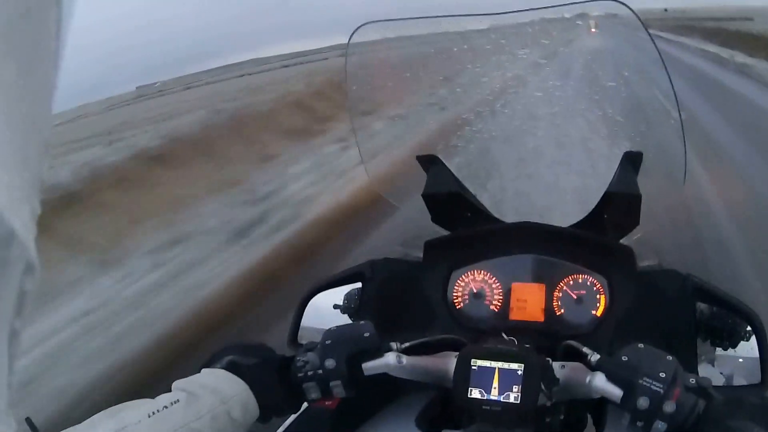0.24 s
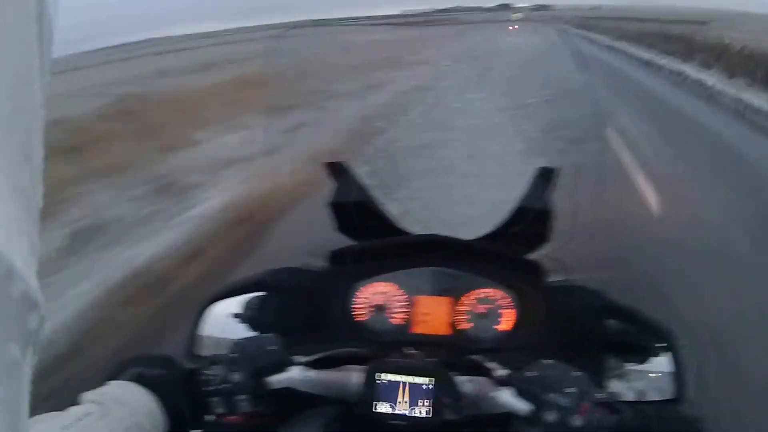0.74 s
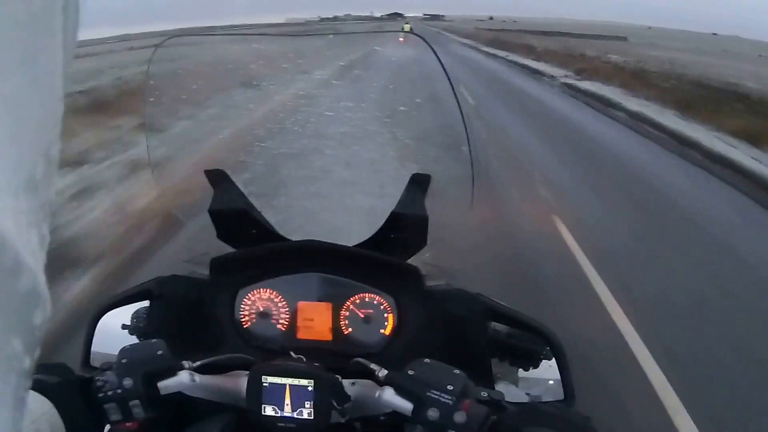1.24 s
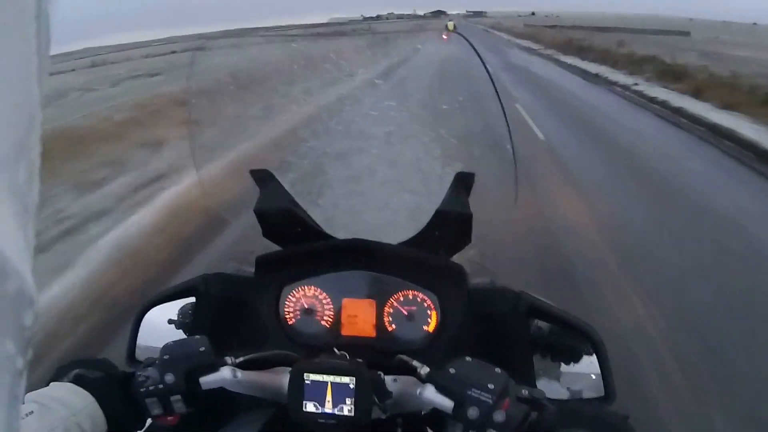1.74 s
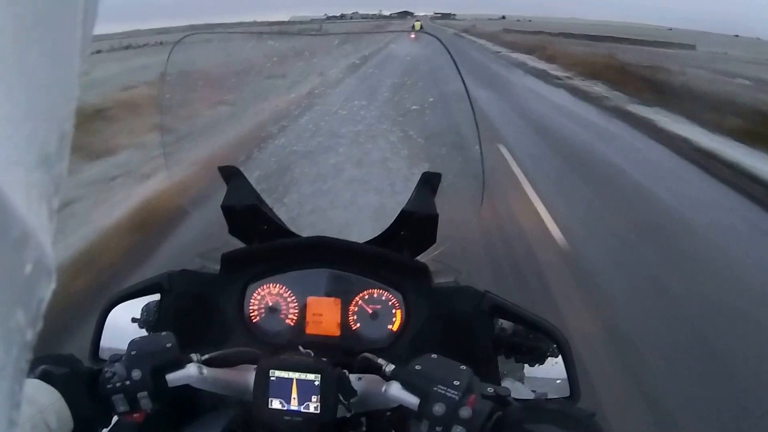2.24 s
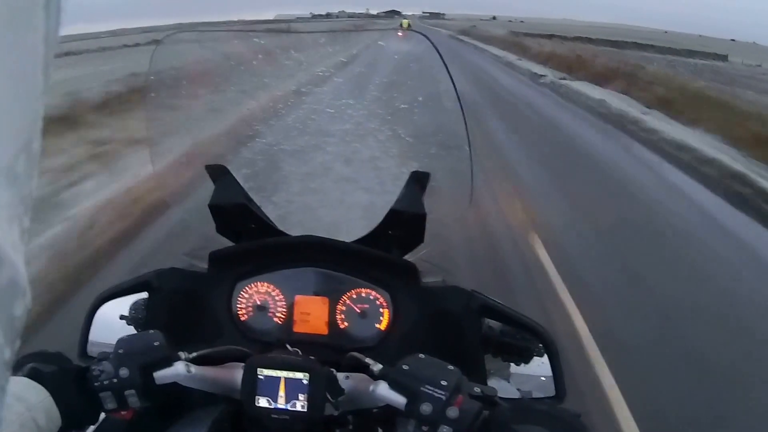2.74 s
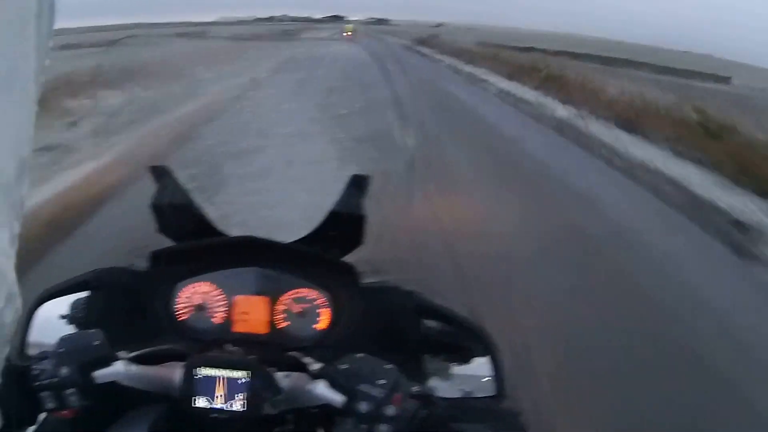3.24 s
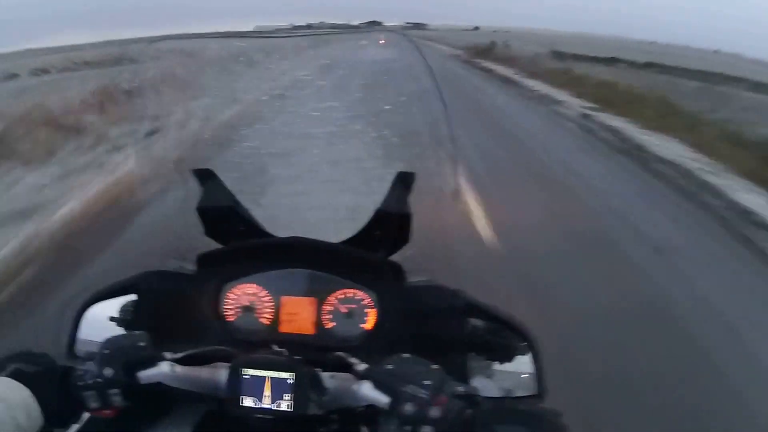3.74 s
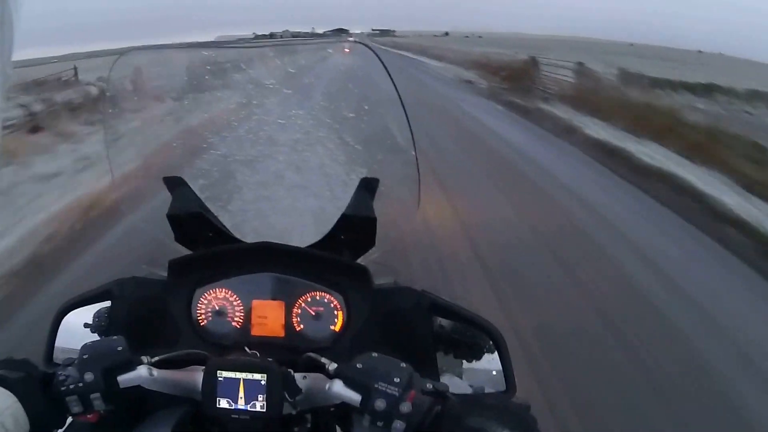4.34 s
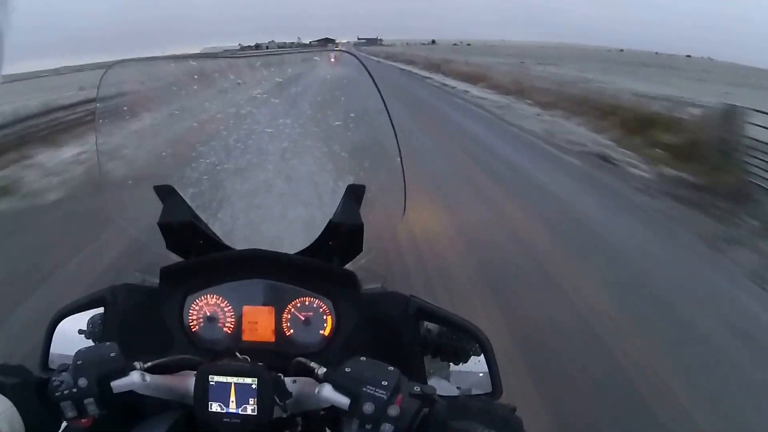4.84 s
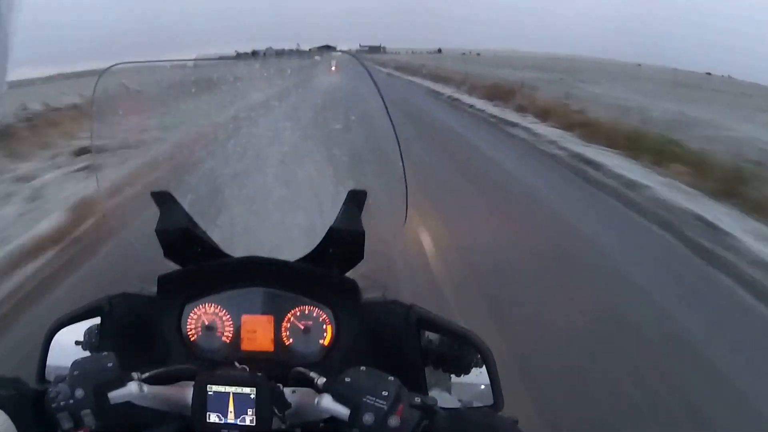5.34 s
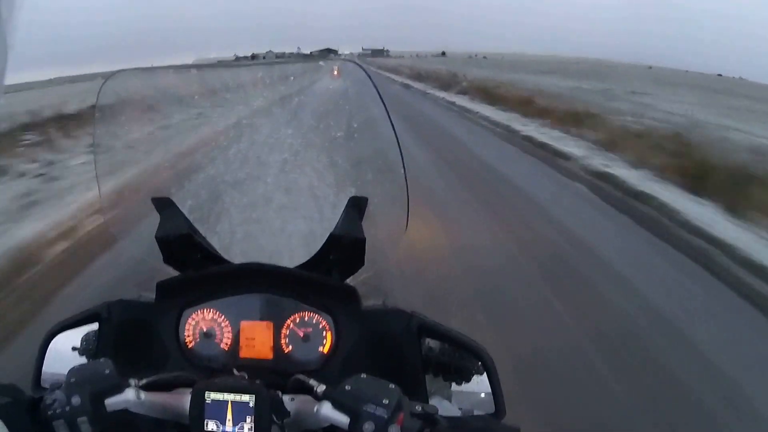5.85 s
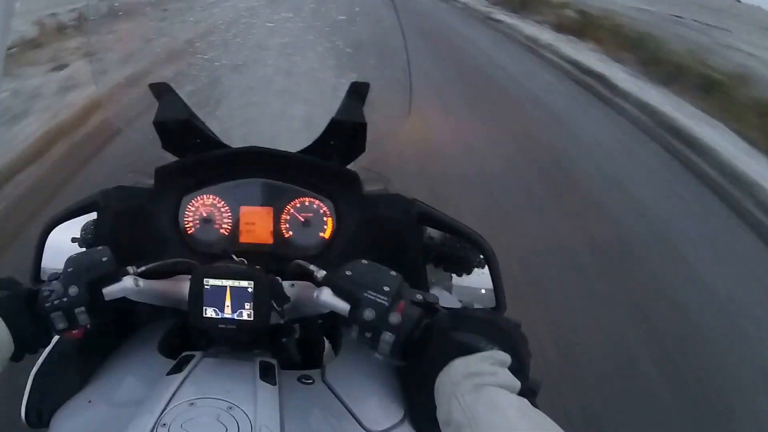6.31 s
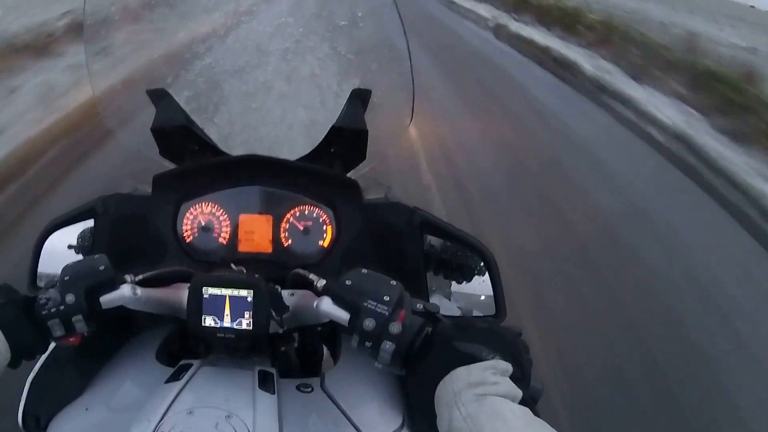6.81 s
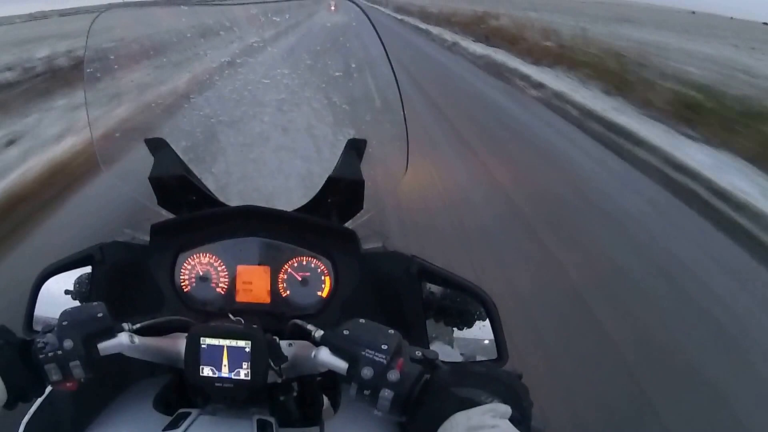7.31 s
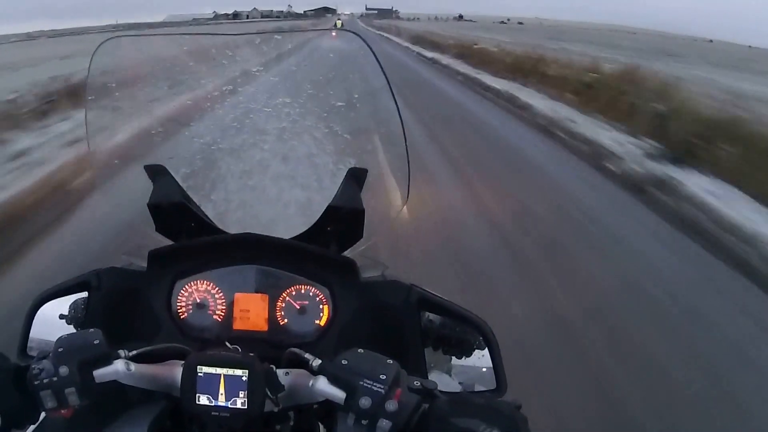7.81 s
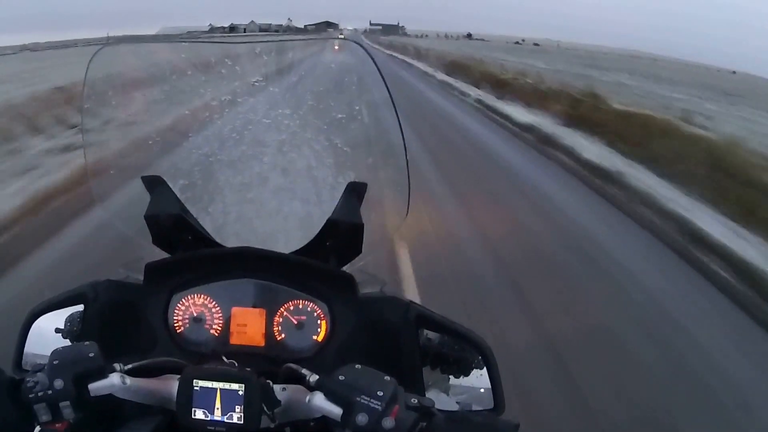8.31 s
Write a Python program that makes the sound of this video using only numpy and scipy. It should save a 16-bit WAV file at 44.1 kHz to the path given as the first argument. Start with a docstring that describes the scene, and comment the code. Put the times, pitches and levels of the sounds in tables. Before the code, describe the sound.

Close wind roar dominates a motorcycle ride along an open wet road. Gusts off the windscreen swell, hold briefly and break off abruptly, with deep rumble, fluttering buffets and sharp slaps. A low, steady engine hum and even tyre hiss sit far beneath. A thin electrical whine cuts out early and returns midway; small puffs of spray and drops tick later. The rider-worn microphone sounds almost mono.

```python
"""Wind roars at a small camera worn by the rider of a touring motorcycle on a wet country road.
Gusts off the windscreen build, hold and break away, driving filtered noise: rumble, buffeting, rush and hiss.
The engine, a few wavering sines, hums faintly underneath, over an even noise from the wet tyres.
Now and then spray hisses (filtered clicks) and a drop ticks on the housing (a short noise burst);
a thin electrical whine, a sum of steady sines, stops and comes back."""
import sys
import numpy as np
from scipy import signal
from scipy.fft import rfft, irfft, next_fast_len
from scipy.io import wavfile
from scipy.ndimage import uniform_filter1d

SR = 44100
rng = np.random.default_rng(int(sys.argv[2]) if len(sys.argv) > 2 else 0)


def generate_wav(signal):
    """Clip the signal to [-1, 1] and save it as 16-bit WAV at the path in sys.argv[1]."""
    frames = np.transpose(np.atleast_2d(signal))
    scaled = np.clip(frames, -1, 1) * 32767
    pcm = np.round(scaled).astype(np.int16)
    wavfile.write(sys.argv[1], SR, pcm)


N = 377937  # samples

# colour of water striking the housing: freq_hz, relative density_db (per Hz)
WATER_COLOUR = [(3500, 4), (7800, -10), (9200, -1), (10400, 1.5), (12000, -7), (15500, -12)]

# each voice of the wind: its base level (dB), and the dB it gains per dB of flow
RUMBLE_DB, RUMBLE_FOLLOWS = -25.3, 0.4
BUFFET_DB, BUFFET_FOLLOWS = -20.6, 0.95
RUSH_DB, RUSH_FOLLOWS = -40.2, 1.0
HISS_DB, HISS_FOLLOWS = -51, 1.2

TILT_LOSS = 0.3  # dB the buffeting loses for each dB of tilt
SLAP_IN_RUSH = 0.5  # share of a slap's rise in dB that reaches the rush
GUST_ATTACK_S, GUST_RELEASE_S = 0.1, 0.024
SLAP_ATTACK_S, SLAP_FADE_S = 0.002, 0.007
SWIRLS_PER_S, SWIRL_DB = 12, 0.6  # small random swirls: turns a second, spread in dB
FIRING_HZ = 97.3  # mean firing rate of the engine
CUTOFF_HZ = 15400  # top of the microphone's band


def wind(flow_db, push_db, rush_db):
    """Rumble, buffeting, rush and hiss rise with the same gusts; all but the rumble share the quick eddies."""
    # level of the hiss over time: time_s, level_db
    hiss_course = [(0, 1.6), (.4, 2.5), (1.55, -0.2), (2.25, 2), (3.15, -1), (4.1, .6), (6.9, -1.1),
                   (7.3, 1.8), (8.57, 0.3)]
    # tilt of the buffeting towards its upper half: time_s, tilt_db
    tilt_course = [(0, .5), (.5, .5), (1.2, -1.2), (3, -1.5), (4.4, .3), (4.75, 3), (5.6, 0), (6.1, 1.5),
                   (6.9, -1), (8.05, .5), (8.35, 4), (8.57, 3)]
    eddies = drift(rate=35.0)
    slap_db = slaps()
    tilt_db, = in_time(tilt_course)
    treble_db, = in_time(hiss_course)
    rumble_db = RUMBLE_DB + RUMBLE_FOLLOWS * flow_db + wavering(rate=4, depth_db=1.0)
    buffet_db = BUFFET_DB + BUFFET_FOLLOWS * push_db - TILT_LOSS * tilt_db + slap_db
    hiss_db = HISS_DB + HISS_FOLLOWS * flow_db + treble_db + wavering(rate=12, depth_db=0.95)
    return (rumble(rumble_db)
            + buffet(buffet_db, tilt_db, eddies, eddy_db=1.02, lump_db=1.1, split_hz=270)
            + rush(rush_db + SLAP_IN_RUSH * slap_db, eddies, eddy_db=0.85, tear_db=0.8)
            + hiss(hiss_db, eddies, eddy_db=1.55))


def flow():
    """Airflow and buffeting in dB: the stream, the strongest gust of the moment and random swirls."""
    # the airstream between gusts: time_s, relative level_db
    stream = [(0.0, -0.5), (0.6, 0.0), (2.45, 0), (3.2, -0.4), (4.8, -1.8), (5.3, 0), (6.5, 1.27),
              (7.5, 1.0), (8.1, -2.5), (8.57, 2.2)]
    # gusts off the windscreen: start_s, length_s, air_rise_db (airflow), push_rise_db (buffeting)
    gusts = [(-0.09, 0.26, 3.5, 2.5), (0.15, 0.37, 5.5, 6.5), (0.704, 0.057, 2.5, 5.5),
             (0.777, 0.12, 2, 4.0), (0.933, 0.12, 4.5, 5), (1.25, 0.26, 4.5, 5.0), (1.53, 0.15, 5, 5.0),
             (1.782, 0.19, 4.5, 4), (2.092, 0.13, 2.0, 1.5), (2.17, 0.11, 6.5, 2), (2.31, 0.06, 1.5, 3),
             (2.521, 0.13, 2, 4.5), (2.679, 0.17, 5.5, 6), (2.828, 0.25, 3.5, 4.5), (3.309, 0.16, 6, 6.0),
             (3.507, 0.064, 7.5, 6.5), (3.607, 0.59, 3.5, 3.5), (4.07, 0.26, 3.5, 6),
             (4.285, 0.18, 6.5, 7.0), (4.49, 0.25, 4.0, 3), (4.83, 0.05, 5, 4), (4.938, 0.22, 3.5, 3.5),
             (5.398, 0.296, 4.5, 5), (5.813, 0.058, 4, 3.5), (6.037, 0.097, 4.0, 4.0),
             (6.19, 0.43, 2.5, 3.0), (6.582, 0.19, 4.0, 5.5), (6.84, 0.14, 3, 4.5), (6.929, 0.12, 4.5, 7.5),
             (7.08, 0.33, 3, -1), (7.482, 0.28, 4.0, 3.5), (7.8, 0.2, 4.5, 4.5), (8.13, 0.22, 4.5, 6),
             (8.453, 0.09, 3.5, 2)]
    stream_db = in_time(stream)[0] + SWIRL_DB * drift(rate=SWIRLS_PER_S)
    air_db, push_db = 0, 0
    for start_s, length_s, air_rise_db, push_rise_db in gusts:
        shape = gust(start_s, length_s)
        air_db = np.maximum(air_db, air_rise_db * shape)
        push_db = np.maximum(push_db, push_rise_db * shape)
    return stream_db + air_db, stream_db + push_db


def gust(start_s, length_s):
    """A gust builds, holds and breaks away quickly; height 1."""
    age = np.arange(N) / SR - start_s
    build = np.clip(age / min(GUST_ATTACK_S, length_s), 0, 1)
    break_away = np.clip(1 - (age - length_s) / GUST_RELEASE_S, 0, 1)
    return build * break_away


def slaps():
    """The sudden, quickly fading rise in dB that each hard eddy gives to the wind at the port."""
    # hard eddies that slap the port: time_s, strength_db
    slap_rows = [(1.603, 6), (2.102, 9), (2.405, 8), (2.772, 6), (3.339, 8), (4.454, 3.5), (5.571, 7),
                 (6.464, 6.5), (7.045, 5), (7.185, 7), (7.441, 7)]
    t = np.arange(N) / SR
    rise_db = np.zeros(N)
    for s, strength_db in slap_rows:
        attack = np.clip(1 + (t - s) / SLAP_ATTACK_S, 0, 1)
        fade = np.exp(-np.maximum(t - s, 0) / SLAP_FADE_S)
        rise_db += strength_db * attack * fade
    return rise_db


def rumble(level_db):
    """The big eddies of the wake press slowly on the microphone."""
    # colour of the rumble: freq_hz, relative density_db (per Hz)
    rumble_colour = [(14, -8), (25, 1), (35, -4), (52, 3), (75, 1.5), (95, -3.5), (130, -20)]
    pressure = coloured(rng.standard_normal((2, N)), rumble_colour)
    return from_db(level_db) * steadied(pressure, span_s=0.27)


def buffet(level_db, tilt_db, eddies, eddy_db, lump_db, split_hz):
    """Smaller eddies burst on the port in quick lumps and make a higher roar than the rumble."""
    # colour of the buffeting: freq_hz, relative density_db (per Hz)
    buffet_colour = [(60, -13.5), (80, -8), (105, 0), (155, 0.5), (200, -3), (265, -5.5), (340, -5),
                     (420, -9.5), (500, -15.5), (630, -21.5), (800, -26), (1100, -39), (1800, -39)]
    lumpy = rng.standard_normal((2, N)) * from_db(lump_db * drift(rate=51))
    pressure = coloured(lumpy, buffet_colour)
    lowpass = signal.butter(2, split_hz, fs=SR, output="sos")
    deep = signal.sosfiltfilt(lowpass, pressure)
    tilted = deep + from_db(tilt_db) * (pressure - deep)
    return from_db(level_db) * steadied(tilted * from_db(eddy_db * eddies), span_s=0.079)


def rush(level_db, eddies, eddy_db, tear_db):
    """Fine turbulence sounds in the hollows of the housing and flutters with every eddy."""
    # colour of the rush, with the hollows of the housing: freq_hz, relative density_db (per Hz)
    rush_colour = [(550, 2), (800, -8), (1080, 2.5), (1300, -1), (1600, 1), (2100, -3.5), (2450, -6),
                   (2700, -4.5), (3250, -5), (4200, -12.5), (6000, -39)]
    torn = rng.standard_normal((2, N)) * from_db(tear_db * drift(rate=77))
    return from_db(level_db + eddy_db * eddies) * coloured(torn, rush_colour)


def hiss(level_db, eddies, eddy_db):
    """The finest turbulence fizzes at the port, swelling with the same eddies."""
    # colour of the hiss: freq_hz, relative density_db (per Hz)
    hiss_colour = [(3000, -2), (4200, -3.5), (4800, 2.5), (6300, -6), (7100, -5.5), (8000, -11), (8900, -7),
                   (10500, -10.5), (12000, -15.5), (13500, -18), (15500, -26)]
    fizz = coloured(grains(per_s=16000, spread_db=4.5), hiss_colour)
    return from_db(level_db + eddy_db * eddies) * fizz


def engine(wander, throb_db):
    """The lowest orders of a twin at steady throttle, wavering a little in pitch and level."""
    # engine orders: order (multiple of the firing rate), level_db (rms, before the throb)
    orders = [(.5, -39), (1, -31.5), (2, -37.5)]
    turns = np.cumsum(FIRING_HZ * (1 + wander * drift(rate=1.59))) / SR
    hum = np.zeros(N)
    for order, level_db in orders:
        level = np.sqrt(2) * from_db(level_db + throb_db * drift(rate=2.3))
        hum += level * np.sin(2 * np.pi * order * turns)
    return hum


def spray():
    """Many tiny droplets merge into a short bright puff."""
    # puffs of spray: time_s, spread_s (of the bell), level_db (rms at the crest)
    puff_rows = [(5.38, 0.023, -53), (5.513, 0.02, -39.5), (7.2, .038, -44), (7.334, 0.029, -43.5),
                 (7.485, 0.028, -47)]
    puffs = sum(from_db(level_db) * bell(s, spread_s) for s, spread_s, level_db in puff_rows)
    return puffs * coloured(grains(per_s=4500, spread_db=-2.0), WATER_COLOUR)


def drops(decay_s):
    """A larger drop splats on the housing with a short bright tick of decaying noise."""
    # drops on the housing: time_s, level_db (at the start of the tick)
    drop_rows = [(0.0495, -37.5), (1.9994, -42), (4.778, -38), (7.3332, -34), (7.5994, -39), (7.634, -36),
                 (8.4095, -35)]
    hits = np.zeros(N)
    for s, level_db in drop_rows:
        hits[round(s * SR)] = from_db(level_db)
    decay = np.exp(-1 / (decay_s * SR))
    splats = signal.lfilter([1], [1, -decay], hits + 1e-18)  # the tiny offset avoids denormals
    return splats * coloured(rng.standard_normal((2, N)), WATER_COLOUR)


def whine(rush_db, follow, flicker_db, trim_db):
    """Electrical interference: a steady set of partials that switches on and off and swells with the rush."""
    # partials of the whine: freq_hz, level_db (before trim and swell)
    partials = [(800, -52), (2400, -52.5), (3200, -50), (4000, -54), (5600, -57), (6400, -55), (7200, -61),
                (8800, -70), (12000, -68), (12800, -63), (13600, -66), (15200, -66)]
    # when the whine sounds: on_s, off_s
    spells = [(-1, 1.355), (4.39, 9)]
    t = np.arange(N) / SR
    switched = sum(1. * ((t > on_s) & (t < off_s)) for on_s, off_s in spells)
    on = uniform_filter1d(switched, size=400)
    # every partial fits whole cycles in a second, so one second repeats without a seam
    second = sum(from_db(level_db) * np.sin(2 * np.pi * (hz * t[:SR] + rng.random()))
                 for hz, level_db in partials)
    swell_db = follow * (rush_db - np.mean(rush_db)) + flicker_db * drift(rate=33)
    return np.sqrt(2) * on * np.resize(second, N) * from_db(trim_db + swell_db)


def tyres(level_db):
    """An even hiss from the wet tarmac fills the lulls."""
    # colour of wet tyres: freq_hz, relative density_db (per Hz)
    tyre_colour = [(1500, 8), (5000, -3.5), (10000, -10.5), (15500, -18)]
    return from_db(level_db) * coloured(rng.standard_normal((2, N)), tyre_colour)


def from_db(db):
    """Decibels to gain."""
    return np.exp(np.asarray(db) * (np.log(10) / 20))


def rms_one(x):
    """Scale to rms 1."""
    return x / np.sqrt(np.mean(x ** 2) + 1e-20)


def in_time(rows):
    """The columns of a curve at every sample."""
    s, *columns = np.transpose(rows)
    return [np.interp(np.arange(N) / SR, s, c) for c in columns]


def at_hz(points, hz):
    """Read a spectrum on a log-frequency axis."""
    f, value = np.transpose(points)
    return np.interp(np.log(hz), np.log(f), value)


def drift(rate):
    """Smooth chance with about this many turns a second; spread 1."""
    step = 40  # samples between the slow values
    r = np.exp(-2 * np.pi * rate * step / SR)
    white = rng.standard_normal(N // step + 2002)
    slow = signal.lfilter([1], [1, -2 * r, r * r], white)[2000:]  # drop the filter's run-in
    return np.interp(np.arange(N) / step, np.arange(len(slow)), rms_one(slow))


def wavering(rate, depth_db):
    """A voice's own random rise and fall in dB."""
    return depth_db * drift(rate)


def bell(s, spread_s):
    """A smooth Gaussian bump of height 1 around the time s."""
    out, t = np.zeros(N), np.arange(N) / SR
    near = np.abs(t - s) < 4 * spread_s
    out[near] = np.exp(-0.5 * ((t[near] - s) / spread_s) ** 2)
    return out


def grains(per_s, spread_db):
    """Two trains of random clicks of uneven size; rms 1."""
    born = rng.random((2, N)) < per_s / SR
    sizes = from_db(spread_db * np.minimum(rng.exponential(1, (2, N)), 4))
    return rms_one(born * sizes * rng.choice([-1, 1], (2, N)))


def coloured(source, colour):
    """Give two white sources a spectrum and make them the mid and side of a narrow stereo pair; rms 1."""
    # width of the stereo image: freq_hz, side_db (relative to mid)
    width = [(30, -45), (250, -40.5), (2000, -41), (12000, -23)]
    size = next_fast_len(N)
    hz = np.maximum(np.arange(size // 2 + 1) * SR / size, 1)
    lowest_hz, highest_hz = colour[0][0], colour[-1][0]
    skirts = np.minimum(1, np.minimum(hz / lowest_hz, highest_hz / hz)) ** 4  # 24 dB an octave
    mid, side = rfft(source, size) * from_db(at_hz(colour, hz)) * skirts
    side = side * from_db(at_hz(width, hz))
    return rms_one(irfft([mid + side, mid - side], size)[:, :N])


def steadied(x, span_s):
    """Even out the slow swells of a noise, so that the flow sets them."""
    power = uniform_filter1d(np.mean(x ** 2, axis=0), max(int(span_s * SR), 2))
    smooth_power = uniform_filter1d(power, max(int(span_s * SR / 2), 2))
    return x / np.sqrt(smooth_power + 1e-9)


def scene():
    """Wind on the microphone, with engine, water and whine beneath it."""
    flow_db, push_db = flow()
    rush_db = RUSH_DB + RUSH_FOLLOWS * flow_db
    hum = engine(wander=0.01426, throb_db=2.0)
    water = spray() + drops(decay_s=0.0017) + tyres(level_db=-49.0)
    interference = whine(rush_db, follow=0.81, flicker_db=0.5, trim_db=-0.7)
    return wind(flow_db, push_db, rush_db) + hum + water + interference


def record(dry):
    """The highest peaks are rounded and the top is cut steeply."""
    rounded = dry / (1 + (dry / 0.97) ** 8) ** (1 / 8)
    steep_cut = signal.ellip(12, 0.1, 80, CUTOFF_HZ, fs=SR, output="sos")  # 0.1 dB ripple, 80 dB stop
    return signal.sosfilt(steep_cut, rounded)


dry = scene()
out = record(dry)
generate_wav(out)
```